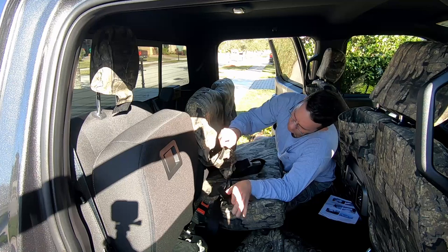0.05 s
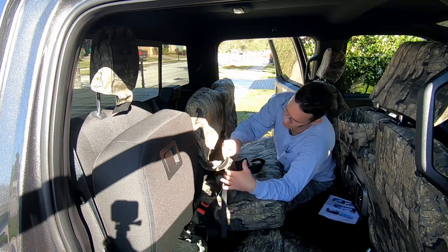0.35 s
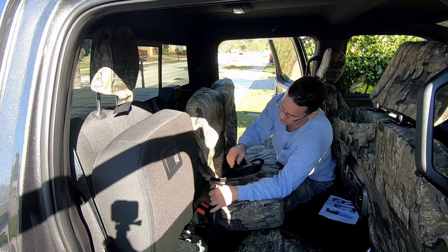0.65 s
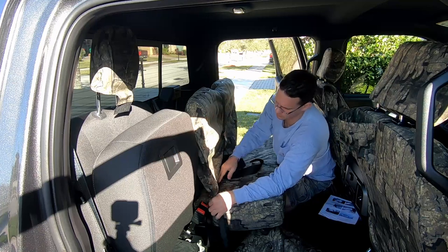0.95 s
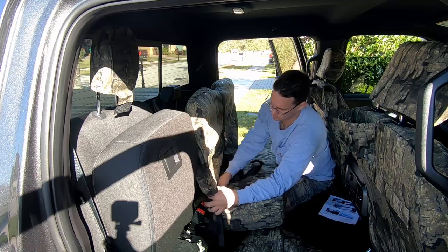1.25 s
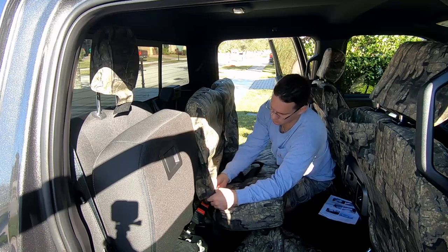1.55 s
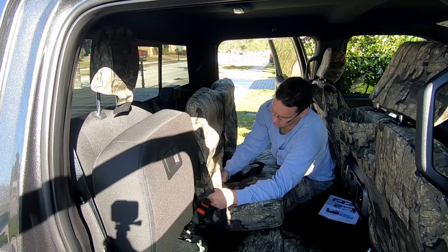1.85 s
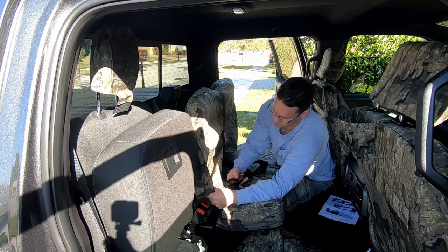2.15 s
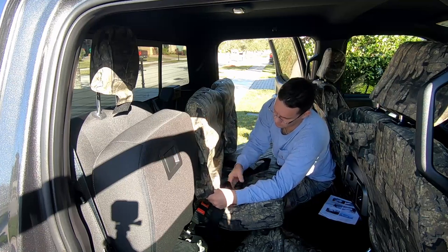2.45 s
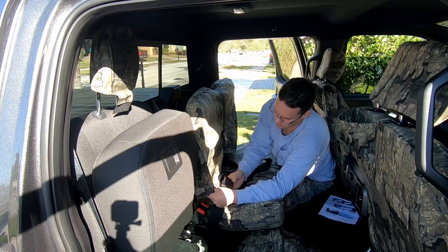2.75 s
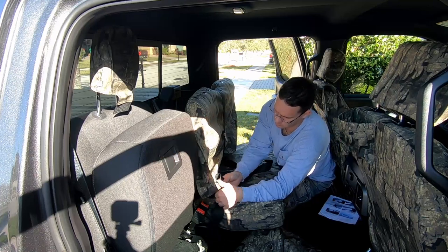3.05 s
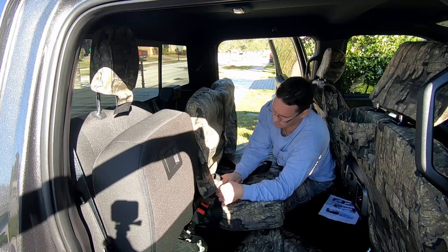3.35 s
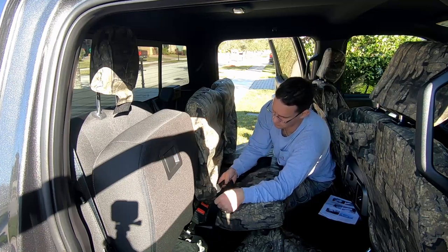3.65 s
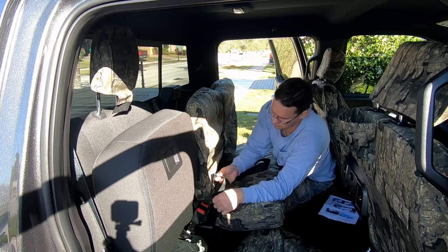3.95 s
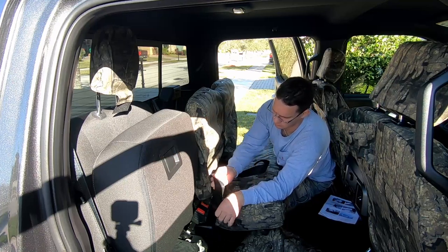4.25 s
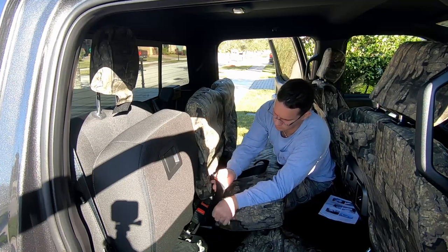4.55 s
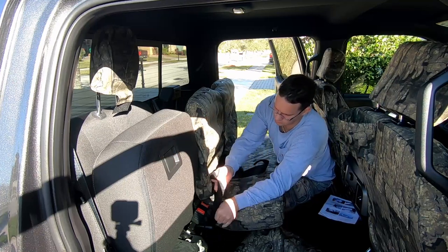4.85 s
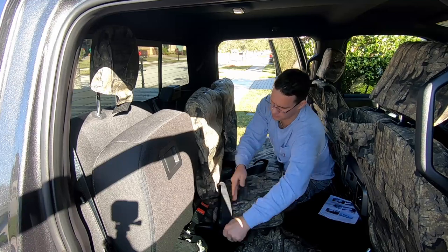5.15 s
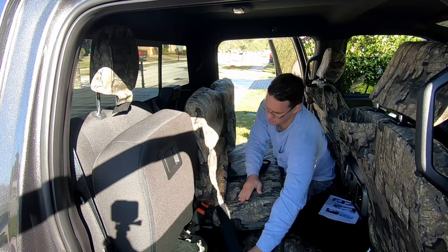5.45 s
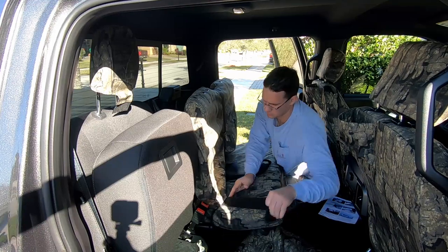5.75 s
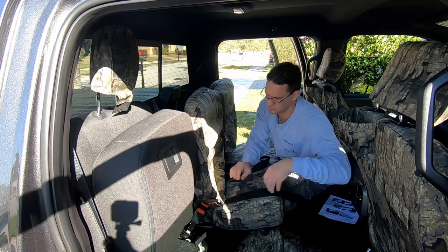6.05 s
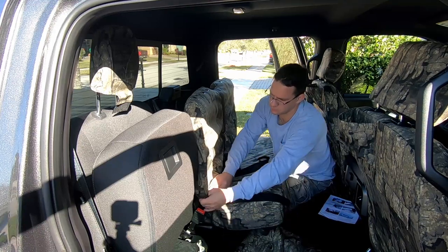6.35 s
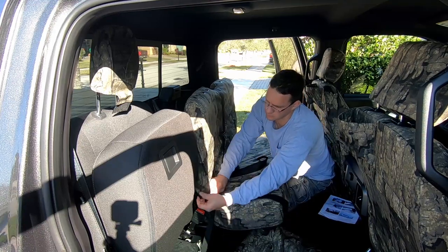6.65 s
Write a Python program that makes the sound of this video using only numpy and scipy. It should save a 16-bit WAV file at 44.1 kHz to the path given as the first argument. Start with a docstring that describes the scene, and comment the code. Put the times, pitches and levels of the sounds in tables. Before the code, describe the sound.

Inside a truck cab with open doors, stiff fabric slides and crackles in uneven pulls, dotted with small clicks. Low wind buffets the microphone from about one second in and eases later, over a very quiet street hum. A strap squeaks briefly midway. Toward the end the cloth is yanked in a quick cluster of louder scuffs and cracks, followed by a short, ringing knock on the seat.

```python
"""A canvas seat cover rustles, scuffs and snaps as it is tugged onto a truck's back seat.
Its threads catch and slip, its stiff fibres tick, and its clips and seams click. A strap squeaks
as it sticks and slips, and near the end a hand knocks the seat, which rings briefly.
Behind this, the open doors let in a quiet street and a breeze that rumbles on the two
openings (ports) of a camera's microphone."""
import sys
import numpy as np
from scipy import signal
from scipy.fft import rfft, irfft
from scipy.io import wavfile

SR = 44100
rng = np.random.default_rng(int(sys.argv[2]) if len(sys.argv) > 2 else 0)


def wav_out(sig):
    """Save sig, one row per channel (or a flat mono array), as 16-bit PCM at SR to the path in sys.argv[1]."""
    wavfile.write(sys.argv[1], SR, np.round(np.clip(np.atleast_2d(sig).T, -1, 1) * 32767).astype(np.int16))


N = 299880
T = np.arange(N) / SR


def amp(db):
    """Turns decibels into a number to multiply by."""
    return 10 ** (np.asarray(db) / 20)

def unit(x):
    """Scales a signal to an average strength (rms) of 1."""
    return x / np.sqrt(np.mean(x ** 2) + 1e-20)

def read(points, hz):
    """Looks up a table's value at any frequency, on a scale of octaves."""
    table_hz, value = np.transpose(points)
    return np.interp(np.log(hz + 1), np.log(table_hz + 1), value)

def follow(rows, t):
    """Looks up each column of a table at the times t."""
    times, *columns = np.transpose(rows)
    return [np.interp(t, times, column) for column in columns]

def add(mix, start, sound):
    """Mixes a sound in at a start time in seconds."""
    part = mix[max(round(start * SR), 0):][:len(sound)]
    part += sound[:len(part)]

def colour(x, points):
    """Gives x the tone (balance of low and high) in a table, at strength 1."""
    hz = np.fft.rfftfreq(len(x), 1 / SR)
    return unit(irfft(rfft(x) * amp(read(points, hz)), len(x)))

def wander(rate_hz):
    """A smooth random wobble of strength 1, up to about rate_hz."""
    hz = np.fft.rfftfreq(N, 1 / SR)
    return unit(irfft(rfft(rng.standard_normal(N)) / (1 + (hz / rate_hz) ** 4), N))

def reshape(x, shape_db, size):
    """Changes the tone of a noise over time, by shape_db(hz, t), keeping its power."""
    hz, t, spectra = signal.stft(x, SR, nperseg=size, noverlap=size * 3 // 4)
    gain = amp(shape_db(hz[:, None], t))
    gain /= np.sqrt(np.mean(gain ** 2, axis=0))
    return signal.istft(spectra * gain, SR, nperseg=size, noverlap=size * 3 // 4)[1][:N]


# The tone of the street: (frequency [Hz], level [dB])
STREET_TONE = [(60, 6.5), (200, 12.5), (450, -3.5), (1200, -1), (3300, -7.5), (5000, -16), (8000, -10.5),
               (11000, -61)]

def street(level_db=-60.5):
    """The quiet street is a steady, soft noise."""
    return amp(level_db) * colour(rng.standard_normal(N), STREET_TONE)


# The breeze on the microphone: (time [s], level [dB])
BREEZE = [(0, -61.5), (0.33, -49.5), (0.47, -60), (0.55, -44.5), (1.1, -31.5), (1.4, -24.5), (1.55, -33),
          (1.9, -26.5), (2.1, -30), (2.22, -33.5), (2.44, -34), (2.52, -52.5), (2.92, -69), (3.0, -33.5),
          (3.48, -41.5), (3.66, -31.5), (4.0, -35), (4.16, -40), (5.8, -48.5), (6.33, -52.5), (6.8, -45)]
# Gusts and sudden swirls: (start [s], level [dB], length [s])
GUSTS = [(0.375, -41.5, 0.044), (0.638, -36, 0.034), (0.743, -33.5, 0.09), (1.151, -21.5, 0.034),
         (1.195, -19, 0.024), (1.278, -22, 0.035), (1.421, -21.5, 0.033), (1.596, -25, 0.024),
         (1.75, -22.5, 0.042), (1.832, -26.5, 0.049), (1.889, -21, 0.055), (2.025, -26, 0.058),
         (2.136, -23.5, 0.04), (2.287, -24.5, 0.028), (2.374, -28.5, 0.05), (2.558, -42, 0.036),
         (2.959, -27, 0.025), (3.123, -26.5, 0.059), (3.19, -24, 0.053), (3.55, -26, 0.032),
         (3.619, -20.5, 0.0096), (3.72, -32, 0.02), (3.867, -29.5, 0.028), (4.066, -26, 0.018),
         (4.19, -26, 0.059), (4.295, -27.5, 0.085), (4.482, -25, 0.062), (4.655, -37, 0.025),
         (4.754, -24.5, 0.0092), (4.788, -32.5, 0.071), (5.228, -35, 0.024), (6.053, -42.5, 0.13),
         (6.49, -37, 0.081)]
# The tone of a moderate gust: (frequency [Hz], level [dB])
GUST_TONE = [(10, -46), (28, -7.5), (60, 5.5), (110, -4.5), (180, -4), (320, -17.5), (550, -28.5),
             (900, -44.5), (2000, -55), (8000, -130)]
# How much higher or lower than usual that tone reaches: (time [s], shift [octaves])
GUST_SHIFT = [(1.0, -0.65), (1.45, 0.11), (2.1, 0.012), (2.4, -0.36), (3.5, 0.046)]

def buffet(flutter_db=3, lump_db=3, db_per_octave=22, moderate_db=-26):
    """Swirling air pushes unevenly on one port; faster air reaches higher frequencies."""
    flutter = flutter_db * np.tanh(wander(rate_hz=7))
    power = amp(follow(BREEZE, T)[0] - 1 + flutter) ** 2
    for start, db, length in GUSTS:
        power += amp(db - 1) ** 2 * np.exp(-abs(2 * (T - start) / length - 1) ** 3)
    def shape_db(hz, t):
        gust_db = np.interp(t, T, 10 * np.log10(power))
        octaves = np.maximum(gust_db - moderate_db, -16) / db_per_octave
        return read(GUST_TONE, hz / 2 ** (octaves + follow(GUST_SHIFT, t)[0]))
    flow = reshape(rng.standard_normal(N), shape_db, size=1024) * amp(lump_db * wander(rate_hz=51))
    window = np.hanning(SR // 11)
    flow_power = abs(signal.fftconvolve(flow ** 2, window / window.sum(), "same"))
    flow /= np.sqrt(flow_power + 1e-12)  # evened out, so the gust alone sets the strength
    return flow * np.sqrt(power)


# The camera goes over to its left port: (time [s], share [0-1])
LEFT_PORT_SHARE = [(1.4, 0), (1.52, 0.61), (2.4, 0.98), (2.8, 0.98)]

def wind(right_db=-2, early_db=3):
    """Each port meets its own swirls, stronger before the camera settles on the left one."""
    boost = amp(early_db * (2 - follow(LEFT_PORT_SHARE, T)[0]))
    return boost * np.array([buffet(), amp(right_db) * buffet()])


# How long the cab echoes: (frequency [Hz], time to fade by 60 dB [s])
CAB_FADE = [(100, 0.032), (1000, 0.082), (8000, 0.056)]

def cab_echo(x, bounces_per_s=3000):
    """Sound bounces around the padded cab and quickly dies away."""
    bounces = rng.standard_normal(SR // 4) * (rng.random(SR // 4) < bounces_per_s / SR)
    bounces[:100] = 0  # the gap before the first bounce
    hz, t, spectra = signal.stft(bounces, SR, nperseg=128)
    fade = amp(-60 * t / read(CAB_FADE, hz)[:, None])
    tail = signal.istft(spectra * fade, SR, nperseg=128)[1]
    return signal.fftconvolve(x, tail / np.linalg.norm(tail))[:N]


# How alike left and right sound: (frequency [Hz], likeness [0-1])
PORT_LIKENESS = [(300, 0.53), (1300, 0.69), (2500, 0.94), (4200, 0.91), (6500, 0.44), (8000, 0.12)]

def ports(x):
    """Sound scatters in the cab, so the right port hears it differently from the left."""
    same = np.clip(read(PORT_LIKENESS, np.fft.rfftfreq(N, 1 / SR)), 0, 1)
    right = irfft(same * rfft(x) + np.sqrt(1 - same ** 2) * rfft(cab_echo(x)), N)
    return np.array([x, right])


# The notes the seat rings with: (frequency [Hz], level [dB], time to fade by 60 dB [s])
SEAT_NOTES = [(83, -4.5, 0.16), (170, -10, 0.27), (234.4, 4.5, 0.17), (311, -9, 0.048),
              (393.2, -5.5, 0.093), (477, -11.5, 0.13), (670, -23, 0.2), (1614, -0.5, 0.057),
              (1780, -6, 0.043)]
# Knocks on the frame, then the cushion: (time [s], level [dB], contact time [s])
KNOCKS = [(6.308, -46.5, 0.0011), (6.448, -41, 0.00078), (6.455, -26, 0.00046), (6.469, -22.5, 0.0021)]

def knocks(rattle_db=-6, rattle_s=0.0077):
    """The knocked seat rings and its fittings rattle; a longer, softer contact sounds duller."""
    out, t = np.zeros(N), np.arange(SR // 3) / SR
    rattle_tone = [(100, -5), (500, -11), (2200, -2), (6000, -24), (15000, -54)]
    for start, db, contact in KNOCKS:
        ring = sum(amp(note_db - 60 * t / fade_s) * np.sin(2 * np.pi * hz * t)
                   / (1 + (hz * contact) ** 2) for hz, note_db, fade_s in SEAT_NOTES)
        rattle = colour(rng.standard_normal(len(t)), rattle_tone) * np.exp(-t / rattle_s)
        add(out, start, amp(db) * (ring + amp(rattle_db) * rattle / (1 + 1000 * contact)))
    return out


# Tight straps and cloth: (start [s], length [s], level [dB], first pitch [Hz], last pitch [Hz])
SQUEAKS = [(2.982, .058, -40.5, 3200, 3280), (3.034, .028, -42.5, 4000, 4050),
           (5.968, .018, -38, 2620, 2580), (6.344, .045, -56, 1030, 880), (6.398, 0.042, -49.5, 787, 474)]

def squeaks(jitter=0.04, grab_db=5.5):
    """A strap sticks and slips at a gliding, shaky rate; its uneven grab makes it scratchy."""
    out = np.zeros(N)
    for start, length, db, first_hz, last_hz in SQUEAKS:
        n = int(length * SR)
        pitch = np.linspace(first_hz, last_hz, n) * (1 + jitter * wander(first_hz / 10)[:n])
        tone = np.sin(2 * np.pi * np.cumsum(pitch) / SR)
        grab = amp(grab_db * wander(first_hz / 10)[:n])
        add(out, start, amp(db) * unit(tone * grab * signal.windows.tukey(n, 0.6)))
    return out


# The tone of rubbing canvas: (frequency [Hz], level [dB])
CANVAS_TONE = [(100, -11.5), (180, 7.5), (400, -3.5), (680, -2.5), (1050, -7), (2000, -1), (2550, -0.5),
               (3080, 5.5), (3550, -0.5), (4200, 0), (5300, -4.5), (8200, -8), (10600, -17.5), (11800, -21),
               (13800, -28.5), (15400, -42)]

def canvas_colour(x, centre_hz, boost_db, octaves):
    """Gives x the tone of canvas, with one ringing band standing out."""
    hz = np.geomspace(100, 16000, 160)
    hump = np.exp(-0.5 * (np.log2((hz + 1) / centre_hz) / octaves) ** 2)
    return colour(x, np.transpose([hz, read(CANVAS_TONE, hz) + boost_db * hump]))


# Snags of clips and stiff seams: (time [s], level [dB], ring [Hz])
CLICKS = [(0.636, -29, 3200), (0.8765, -35, 8000), (0.9663, -26.5, 4400), (0.9965, -35, 4200),
          (1.3209, -25.5, 2780), (1.4413, -32, 2900), (1.6874, -30, 2890), (1.916, -27.5, 3350),
          (2.5691, -28, 2920), (2.7841, -29, 2920), (3.1205, -33, 4200), (3.3715, -40, 4070),
          (3.5249, -28.5, 3760), (3.5465, -25.5, 3500), (3.8876, -32.5, 4260), (3.9235, -31, 2620),
          (4.1674, -30, 3300), (4.2094, -30, 2920), (4.2243, -27, 2760), (4.5027, -27, 6280),
          (4.5164, -34, 4160), (4.5461, -34, 2060), (5.3138, -29.5, 2870), (5.4434, -20, 2210),
          (5.538, -19, 4200), (5.9747, -27, 2560)]

def clicks(level_db=-0.9, rise_s=0.0003, decay_s=0.0023):
    """A clip or seam gives way with a dry crack, coloured by its own brief ring."""
    out, t = np.zeros(N), np.arange(2048) / SR
    shape = (1 - np.exp(-t / rise_s)) * np.exp(-t / decay_s)
    for start, db, hz in CLICKS:
        crack = shape * canvas_colour(rng.standard_normal(len(t)), hz, boost_db=8, octaves=0.3)
        add(out, start, amp(db + level_db) * unit(crack) * np.sqrt(np.mean(shape ** 2)))
    return out


def threads(per_s, spread_db, hiss):
    """Threads catch and let go: tiny slips of uneven size over a smooth hiss."""
    size = amp(spread_db * np.minimum(rng.exponential(1, N), 4.5))
    slips = size * rng.choice([-1, 1], N) * (rng.random(N) < per_s / SR)
    return unit(unit(slips) + hiss * rng.standard_normal(N))


# Quick tugs of the cloth: (start [s], level [dB], length [s], ring [Hz])
TUGS = [(0.412, -39.5, 0.007, 4540), (0.448, -44, 0.013, 2970), (0.489, -39.5, 0.017, 3000),
        (0.563, -42, 0.044, 2150), (1.502, -39, 0.013, 2100), (1.852, -37.5, 0.048, 6500),
        (2.356, -32, 0.02, 3200), (2.535, -40.5, 0.055, 3100), (2.613, -41, 0.022, 3550),
        (2.923, -41.5, 0.03, 3000), (2.999, -35.5, 0.027, 1950), (3.522, -43, 0.017, 3600),
        (3.597, -37.5, 0.015, 4100), (3.713, -37.5, 0.05, 2900), (4.239, -33, 0.012, 1780),
        (4.501, -41, 0.024, 5900), (4.609, -32.5, 0.0062, 3483), (4.624, -37.5, 0.023, 2280),
        (5.429, -25.5, 0.023, 3700), (5.466, -24.8, 0.038, 2700), (5.534, -26.3, 0.021, 4170),
        (5.569, -30, 0.021, 3000), (5.929, -34.5, 0.032, 2520), (6.747, -41.5, 0.011, 2120)]

def scuffs(rise_share=0.18):
    """Each tug is a dense burst of slipping threads that starts fast and runs out."""
    out = np.zeros(N)
    slips = threads(per_s=4600, spread_db=3, hiss=0.6)
    for start, db, length, hz in TUGS:
        progress = np.arange(int(2 * length * SR)) / (length * SR)
        shape = (1 - np.exp(-progress / rise_share)) * np.exp(-progress ** 4)
        burst = canvas_colour(slips[int(start * SR):][:len(shape)], hz, boost_db=7, octaves=0.5)
        add(out, start, amp(db) * burst * shape[:len(burst)])
    return out


# Constant handling of the cover; crispness is its treble, fullness its lower tones:
# (time [s], level [dB], crispness [dB], fullness [dB])
HANDLING = [(0, -47, -7, -29.5), (0.13, -53, -5, -15), (0.18, -63.5, -22, -20), (0.39, -65.5, -9, -22),
            (0.43, -52.5, -14.5, -10), (0.9, -52, -9, -15), (1.3, -48, -5.5, -9), (1.75, -42.5, -21, -13.5),
            (2.06, -50.5, -13, 1), (2.43, -41.5, -27.5, -23.5), (2.53, -52, -17.5, -19.5),
            (2.73, -46.5, -18, -14), (3.36, -54, -20.5, -9.5), (3.6, -44.5, -6.5, -14),
            (4.2, -48.5, -15, -1.5), (4.42, -51.5, -8, -9), (5.0, -56, -15.5, -7), (5.4, -45, -16.5, 0),
            (6.26, -48.5, -22.5, -11), (6.55, -44, -20.5, -4), (6.8, -49, -16, -9.5)]
# Pulls along the seat: (start [s], length [s], level [dB], crispness [dB], fullness [dB])
PULLS = [(0.977, 0.14, -50.5, -5, -21), (1.162, 0.16, -42.5, -12.5, -17.5), (1.755, 0.15, -44, -4, -23),
         (1.956, 0.039, -42, -25, -42), (2.141, 0.12, -31.5, -17, -14.5), (2.307, 0.064, -37, -11, -12.5),
         (2.821, 0.054, -41, -21, -20), (3.007, 0.074, -40, -27, -21), (3.107, 0.088, -47, -24.5, -21),
         (3.541, 0.083, -38, -19.5, -8), (3.702, 0.084, -34.5, -19, -12), (4.019, 0.24, -44, -13.5, -17),
         (4.315, 0.037, -45.5, -13, -43), (4.585, 0.11, -47, -16, -8), (4.752, 0.11, -49.5, -9.5, -13.5),
         (5.085, 0.27, -40.5, -15, -16), (5.43, 0.1, -30.5, -10.5, -11.5), (5.566, 0.082, -37.5, -9, -19),
         (5.842, 0.22, -43.5, -16.5, -17.5), (6.292, 0.22, -46, -11, -1)]
# The hands pause for a new grip: (start [s], length [s])
PAUSES = [(0.883, 0.043), (2.71, 0.049), (3.076, 0.031), (4.379, 0.077), (5.551, 0.011), (6.199, 0.1)]

def cloth_motion(t, rise_s=0.026, fall_s=0.038, sag_db=-2, pause_db=-9.5):
    """Power, crispness and fullness of the moving cloth; the louder movement sets the tone."""
    db, crisp, full = follow(HANDLING, t)
    power = amp(db) ** 2
    for start, length, pull_db, pull_crisp, pull_full in PULLS:
        age = t - start
        grip = (1 + np.tanh(age / rise_s)) * (1 - np.tanh((age - length) / fall_s)) / 4
        pull = grip * amp(pull_db + sag_db * (2 * age / length - 1) ** 2) ** 2  # fastest midway
        power += pull
        crisp += (pull_crisp - crisp) * pull / power
        full += (pull_full - full) * pull / power
    for start, length in PAUSES:
        power *= amp(pause_db * np.exp(-(2 * (t - start) / length - 1) ** 4)) ** 2
    return power, crisp, full


def surges(per_s, spread_db, limit, decay_s):
    """Creases or fibres give way at random: each makes a sharp surge that dies away."""
    size = amp(spread_db * np.minimum(rng.exponential(1, N), limit))
    kicks = size * (rng.random(N) < per_s / SR)
    return signal.lfilter([1], [1, -np.exp(-1 / (decay_s * SR))], kicks)


# The tone of snapping fibres: (frequency [Hz], level [dB])
FIBRE_TONE = [(1000, -6.5), (3500, 8), (7000, -4), (10500, -13), (15000, -23)]

def crackle(level_db=-10.5):
    """Stiff fibres snap as the canvas bends: dry little ticks that follow its motion."""
    snaps = surges(per_s=135, spread_db=2.5, limit=2, decay_s=0.0007) * rng.standard_normal(N)
    power, crisp, _ = cloth_motion(T[::20])
    strength = np.sqrt(power) * amp(np.minimum(crisp - crisp.mean(), 2))
    return amp(level_db) * colour(snaps, FIBRE_TONE) * np.interp(T, T[::20], strength)


def rustle(crinkle=0.2, patch_db=2, stretch_octaves=0.06, usual_crisp_db=-11, usual_full_db=-13):
    """Sliding canvas: threads slip in clumps, and shifting folds change their tone."""
    def shape_db(hz, t):
        _, crisp, full = cloth_motion(t)
        blur = np.outer(np.hanning(13), np.hanning(11))
        patches = unit(signal.fftconvolve(rng.standard_normal((len(hz), len(t))), blur, "same"))
        highs_db = (crisp - usual_crisp_db) / (1 + (4800 / (hz + 1)) ** 5)
        lows_db = (full - usual_full_db) / (1 + (hz / 1800) ** 4)
        # the tone drifts as the cloth tightens and slackens
        stretch = 2 ** (stretch_octaves * np.interp(t, T, wander(rate_hz=7)))
        return read(CANVAS_TONE, hz / stretch) + highs_db + lows_db + patch_db * patches
    clumps = 0.5 + crinkle * unit(surges(per_s=120, spread_db=-7.5, limit=3, decay_s=0.011))
    slips = unit(threads(per_s=4000, spread_db=1, hiss=1) * clumps)
    power = np.interp(T, T[::20], cloth_motion(T[::20])[0])
    return reshape(slips, shape_db, size=512) * np.sqrt(power)


def scene(echo_db=-16):
    """Cloth and seat in the cab, the quiet street, and wind on the microphone."""
    work = rustle() + crackle() + scuffs() + clicks() + knocks() + squeaks()
    echo = amp(echo_db) * cab_echo(work)
    return ports(work + echo + street()) + wind()


def record(dry):
    """Below the top treble the right side fades over to the left port; the very top is cut off."""
    blend_below_hz, cutoff_hz = 11300, 15500
    below = 1 / (1 + (np.fft.rfftfreq(N, 1 / SR) / blend_below_hz) ** 24)
    share = follow(LEFT_PORT_SHARE, T)[0]
    left, right = dry
    right = right + share * irfft(rfft(left - right) * below, N)
    lowpass = signal.firwin(511, cutoff_hz, window=("kaiser", 9), fs=SR)
    return signal.oaconvolve(np.array([left, right]), lowpass[None], "same", axes=1)


dry = scene()
out = record(dry)
wav_out(out)
```